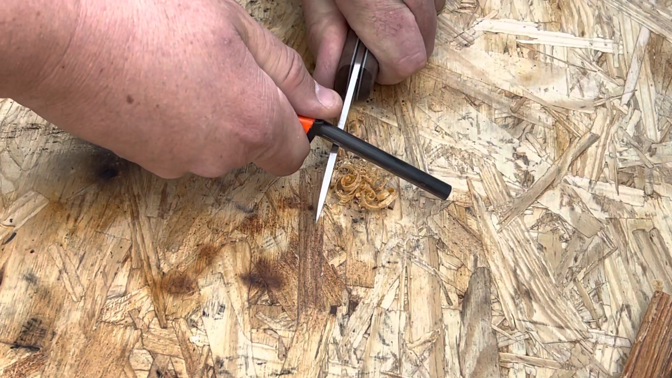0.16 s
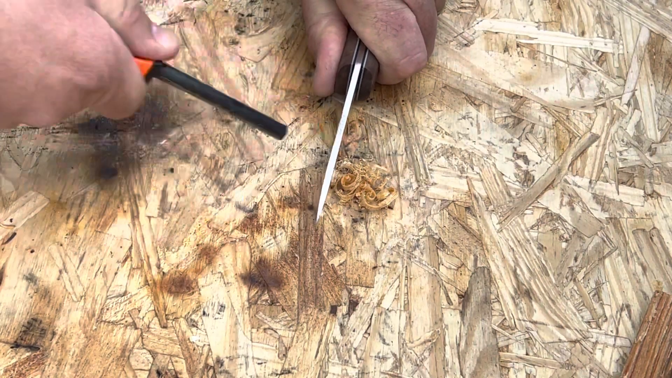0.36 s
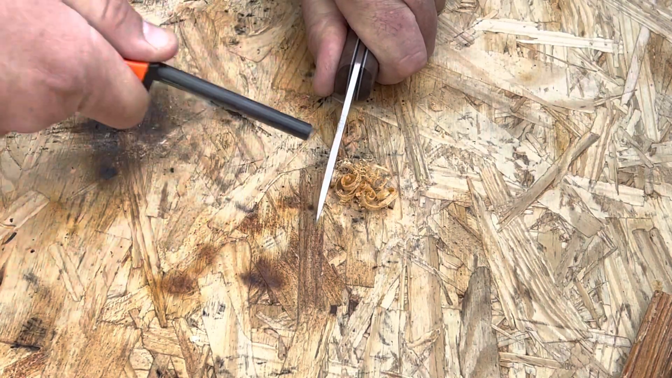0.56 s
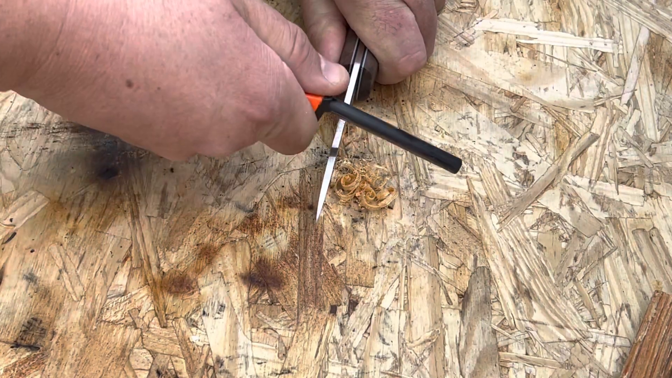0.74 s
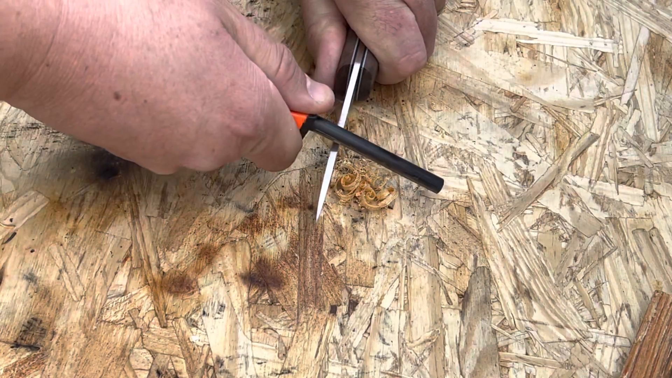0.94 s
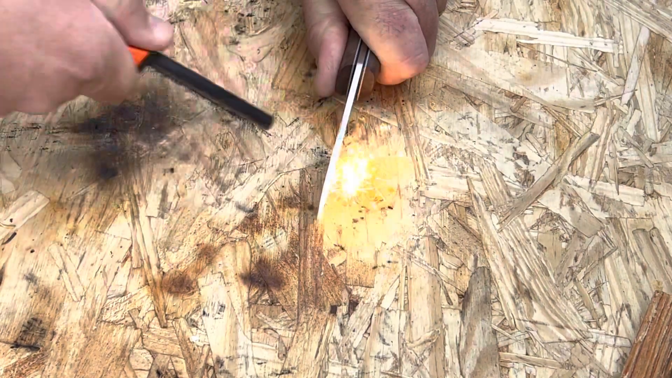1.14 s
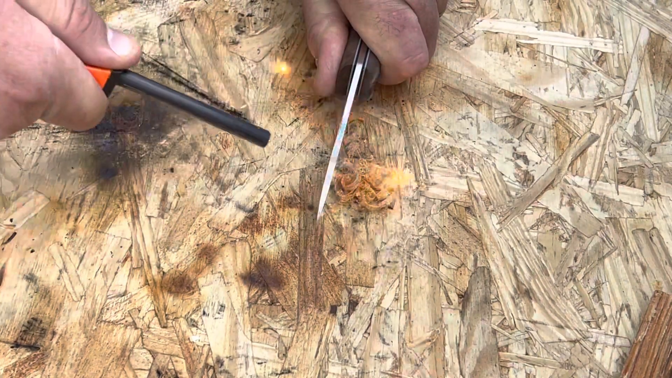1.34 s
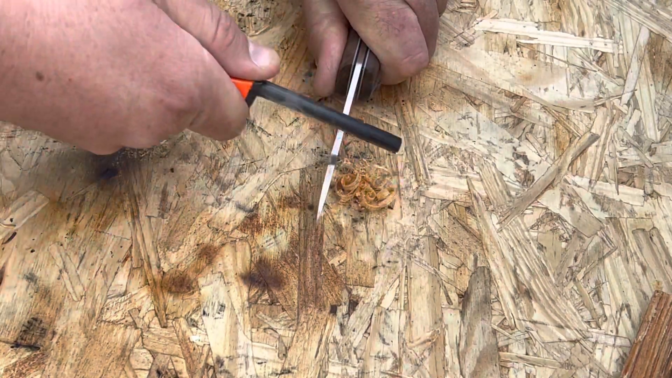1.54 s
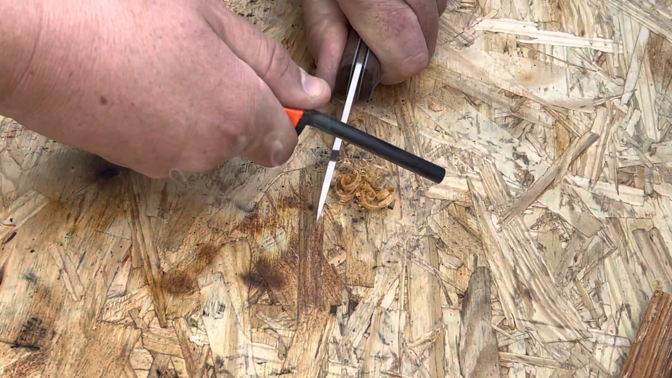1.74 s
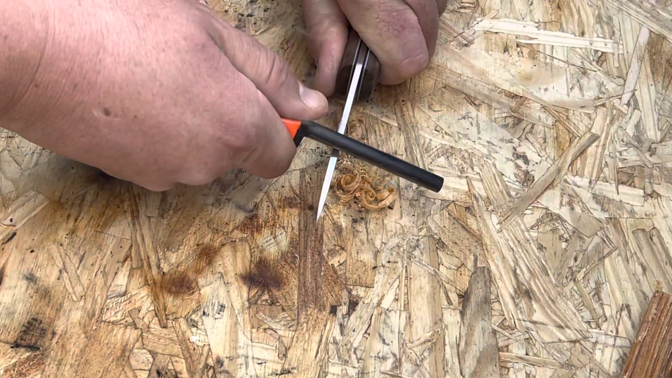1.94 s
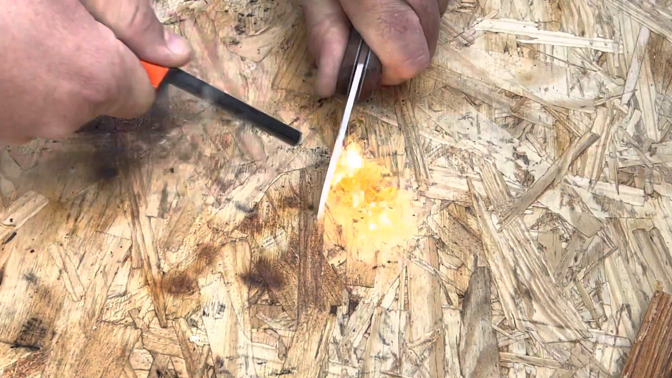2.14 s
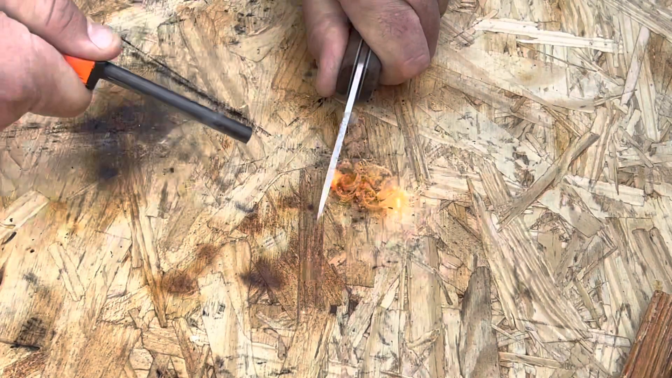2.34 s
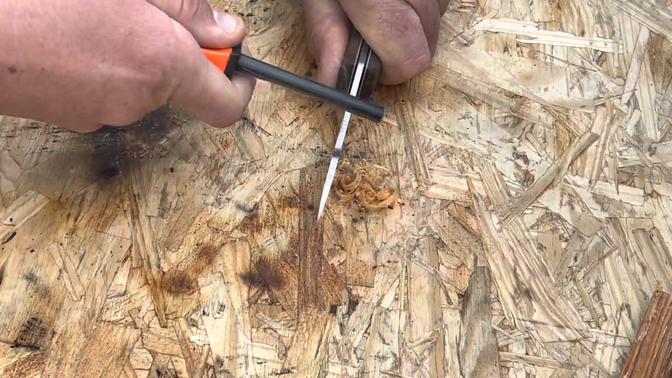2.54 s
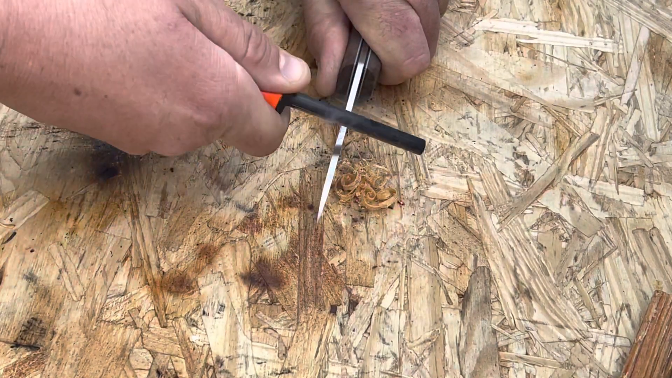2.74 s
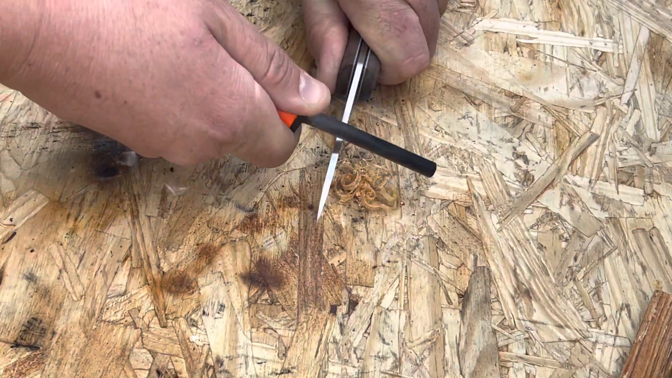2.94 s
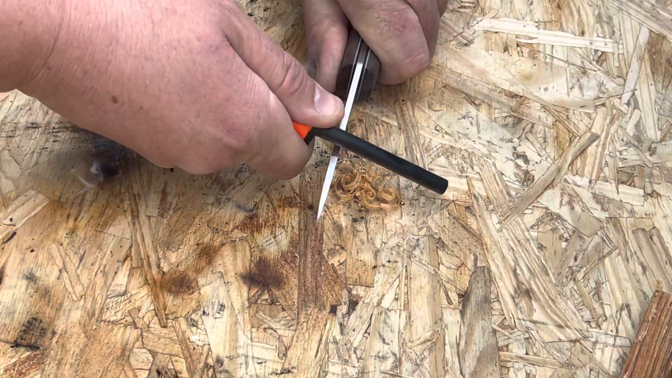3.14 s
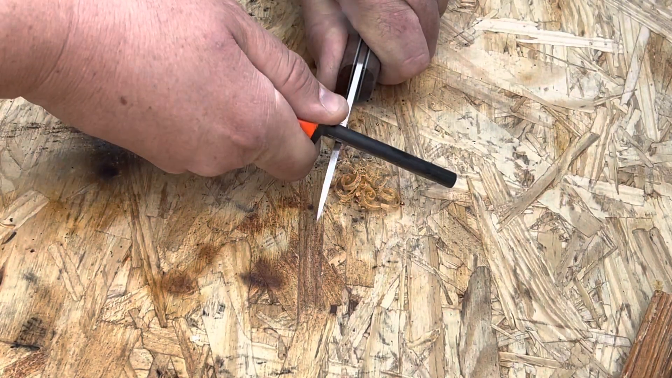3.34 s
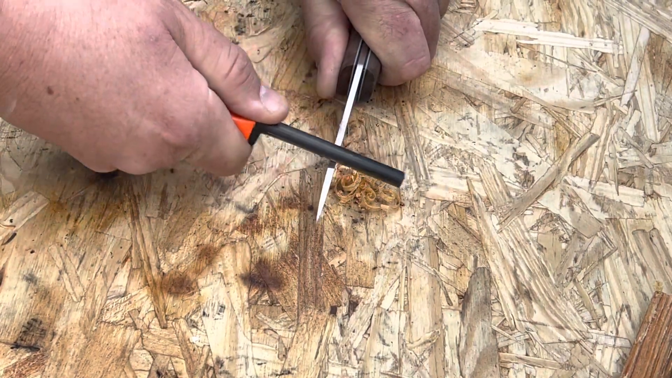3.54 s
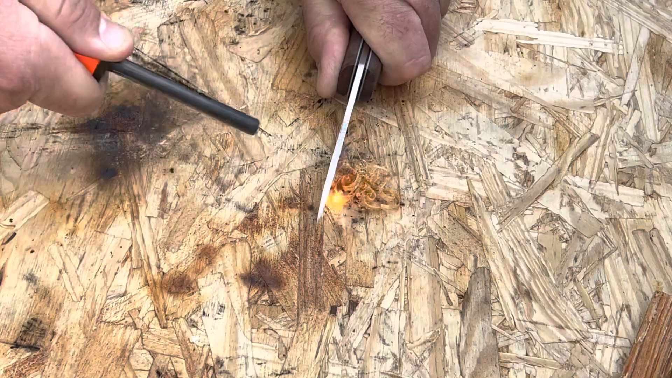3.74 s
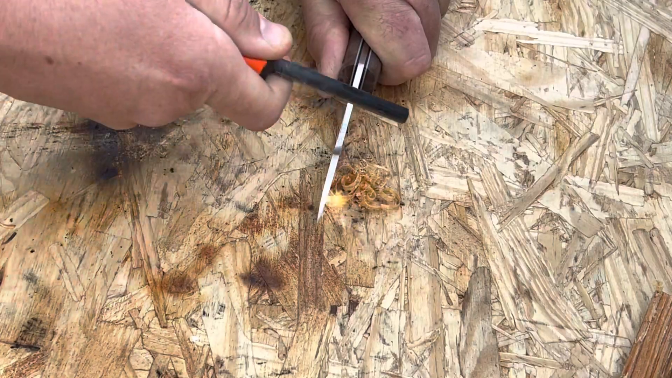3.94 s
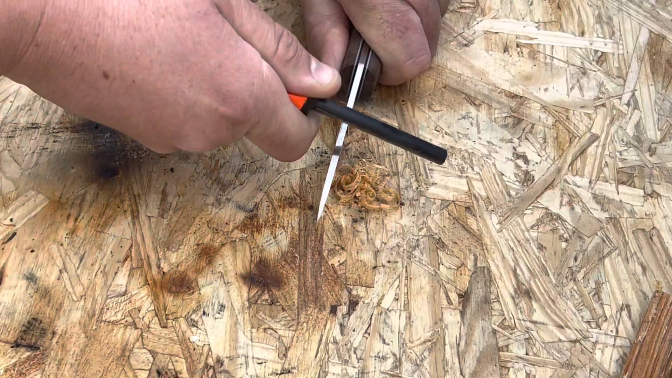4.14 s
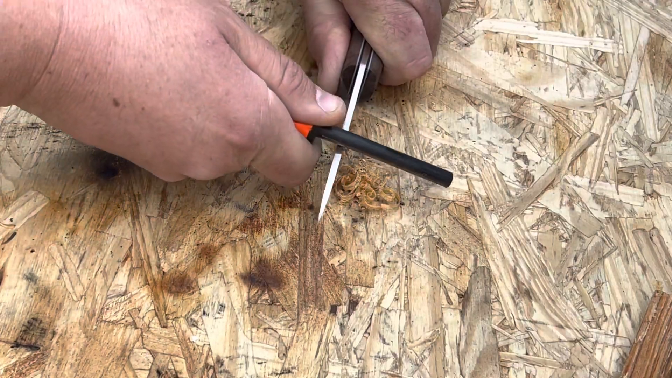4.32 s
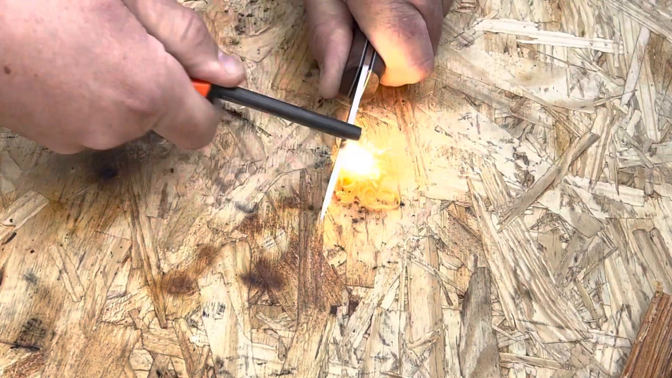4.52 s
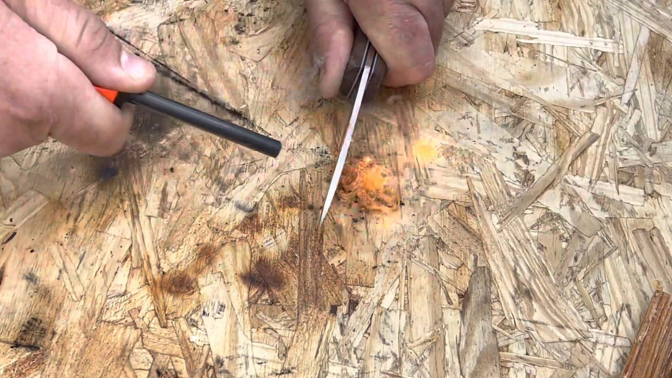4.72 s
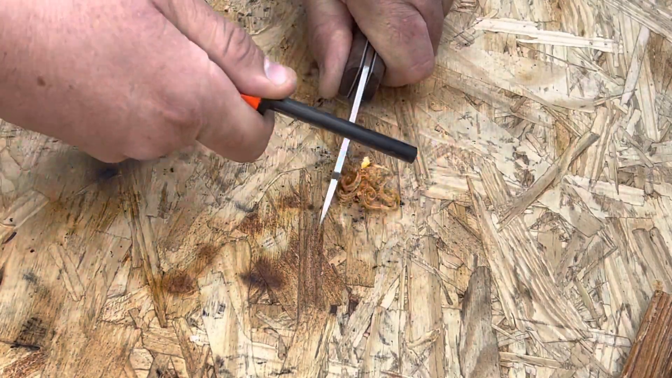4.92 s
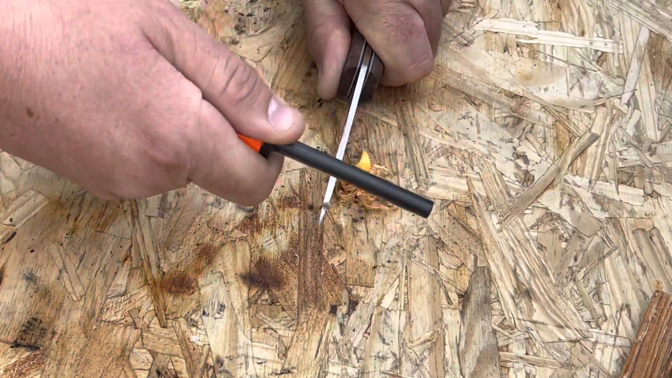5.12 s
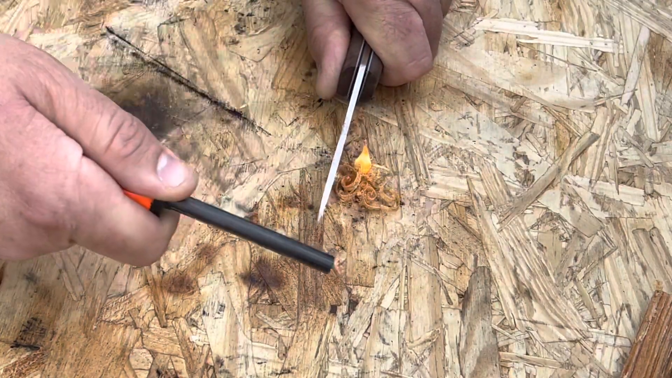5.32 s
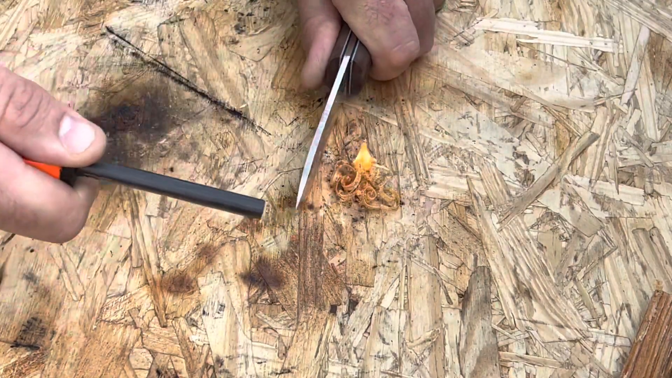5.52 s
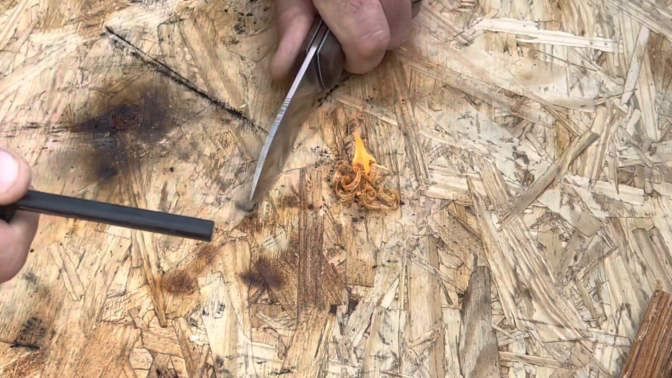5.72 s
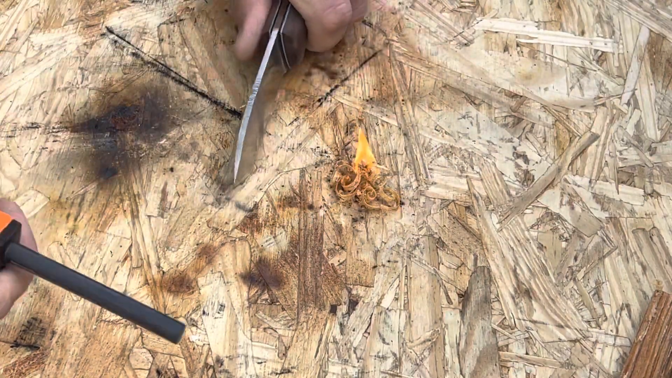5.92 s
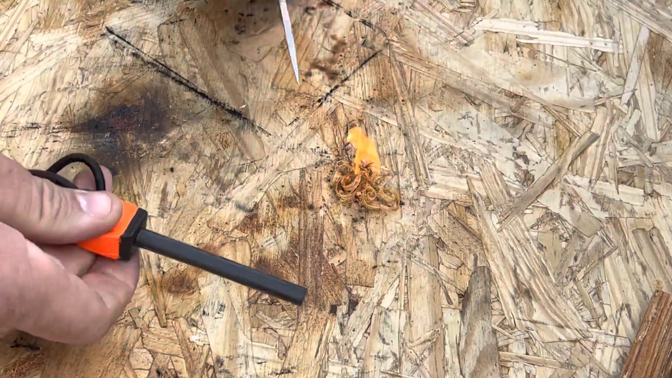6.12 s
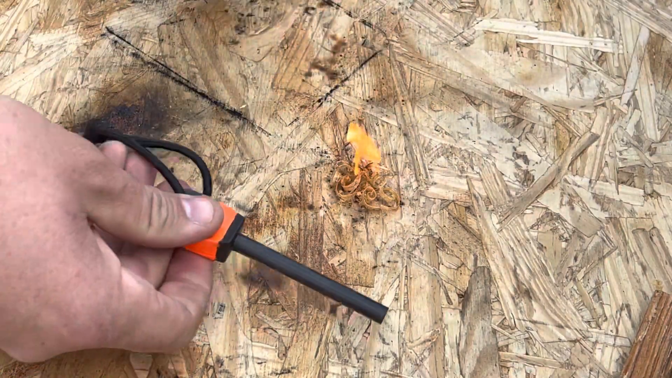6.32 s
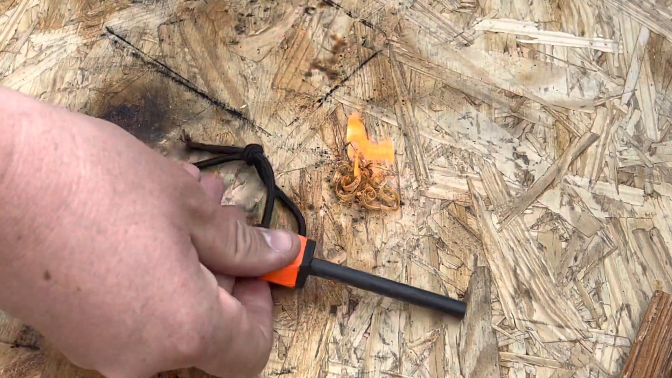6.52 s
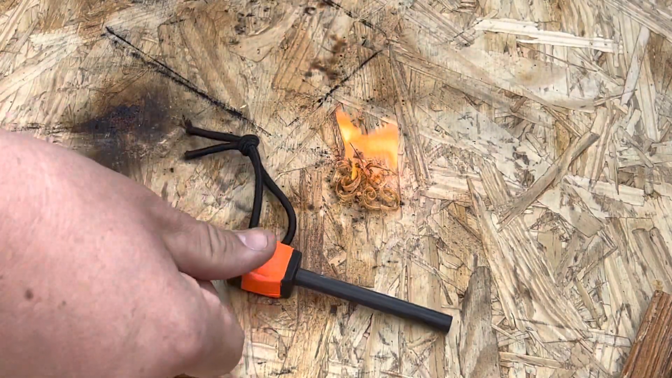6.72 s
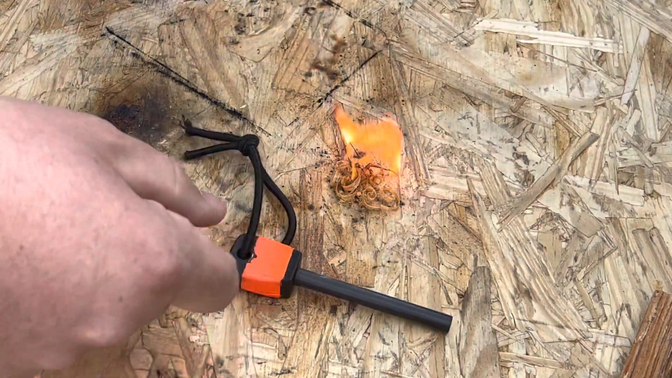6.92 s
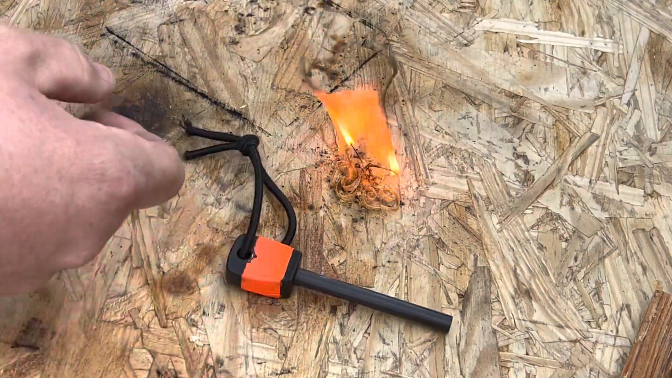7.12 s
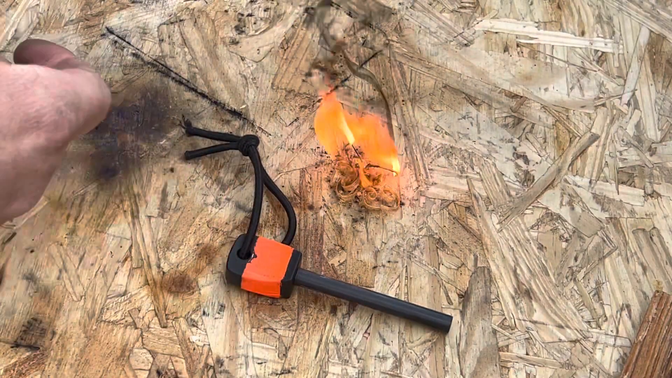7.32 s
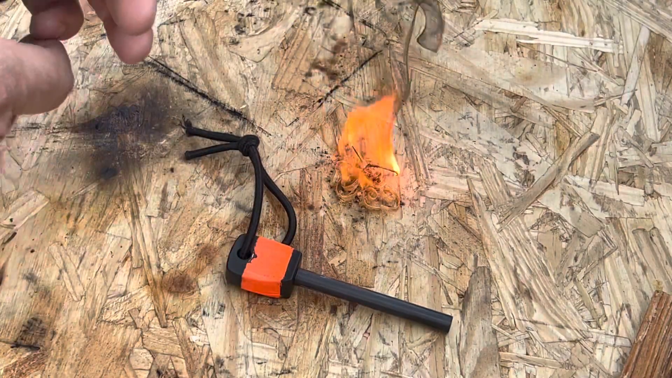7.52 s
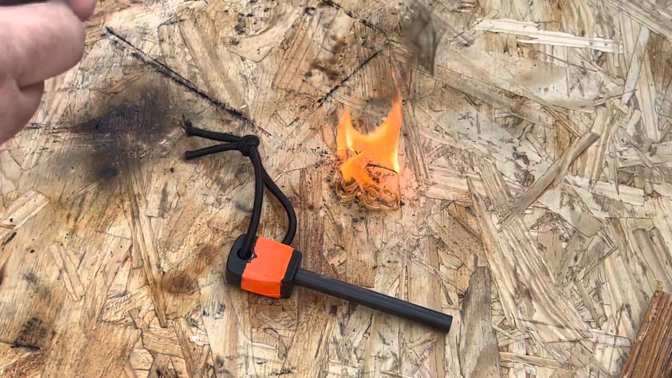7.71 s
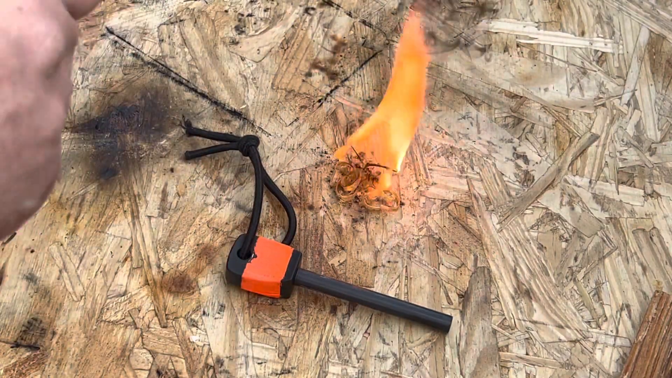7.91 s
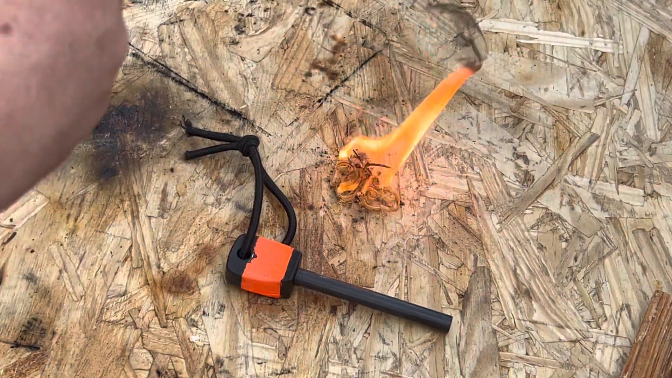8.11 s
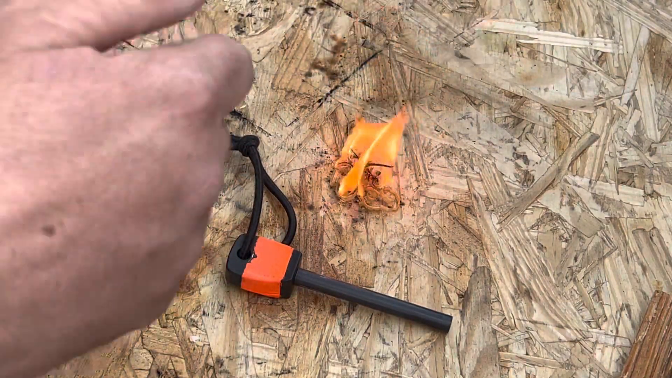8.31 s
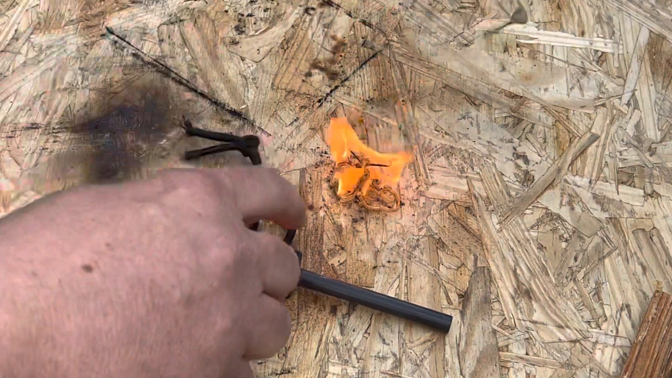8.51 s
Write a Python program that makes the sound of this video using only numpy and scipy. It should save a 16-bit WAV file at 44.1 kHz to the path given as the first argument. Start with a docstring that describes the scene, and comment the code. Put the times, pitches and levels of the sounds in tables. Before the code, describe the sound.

Outdoors, close stereo pickup over a chipboard bench, with faint low traffic rumble and hum throughout. After tiny taps at 0.1 s, a duller rasp of steel on rod grinds from 0.2 to 0.36 s, followed by a hand shuffle and rub near 0.55 s and a tap at 0.87. A hard, bright scrape bites at 1.03-1.13 s, sparks spitting until 1.3. A firm knock lands at 1.82, then another harsh scrape at 2.03-2.16 with fizz trailing to 2.5. A tap at 3.2 precedes a longer building rasp at 3.4-3.6; a lighter tap at 4.27 leads to the last sharp scrape at 4.44-4.55, sparks crackling after. From 5 s a small flame ticks and hisses very faintly, with spits near 5.48. Hands shuffle around 6 s; the rod is set down with woody clacks at 6.44, 6.62 and 6.7. Soft rustling, weak spits and barely audible low tones near 7.3-7.8 and 8.4 finish quietly.

```python
"""A fire rod is dragged five times across a knife spine above a chipboard bench outdoors.
The edge catches and slips on the rod: random grains and jolts ring the modes of board and steel, sparks hiss
and spit as coloured noise. Between strokes the rod is tapped onto the spine, at the end laid on the board.
Sleeves rustle, a small flame ticks, faint low tones come and go, far traffic rumbles in shaped stereo noise.
Two microphone ports hear the bench with a phase and level difference that depends on frequency."""
import sys
import numpy as np
from scipy import signal
from scipy.fft import rfft, irfft, next_fast_len
from scipy.io import wavfile

SR = 44100
rng = np.random.default_rng(int(sys.argv[2]) if len(sys.argv) > 2 else 0)


def transcribe(u):
    """Save the signal u as a 16-bit wav file named by the first command-line argument.

    u: samples, shape (n,) or (channels, n), limited to [-1, 1]; the rate is SR.
    q: integer samples, one column per channel.
    """
    v = np.clip(np.atleast_2d(u).T, -1, 1)
    q = np.round(v * 32767).astype(np.int16)
    wavfile.write(sys.argv[1], SR, q)


def how_loud(loudness_db):
    """Turn decibels into a plain amplitude multiplier (0 dB gives 1, 20 dB gives 10)."""
    steps = np.asarray(loudness_db, float) / 20
    return 10 ** steps


N = 377496   # samples


def at_hz(points, hz):
    """Reads a table on a log-frequency axis."""
    points = np.array(points)
    return np.interp(np.log(hz + 1), np.log(points[:, 0]), points[:, 1])


def in_time(rows, outside=None):
    """Columns of a curve, sample by sample."""
    s, *columns = np.transpose(rows)
    return np.array([np.interp(np.arange(N) / SR, s, c, outside, outside) for c in columns])


def band(x, low_hz, high_hz):
    """Band-pass."""
    return signal.sosfilt(signal.butter(2, [low_hz, high_hz], "band", fs=SR, output="sos"), x)


def band_one(x, low_hz, high_hz):
    """Scales so that one band has rms 1."""
    return x / np.std(band(x, low_hz, high_hz))


def drift(rate):
    """Slow chance: random knots of spread 1, rate of them a second, joined by lines."""
    knots = rng.standard_normal(4000)
    return np.interp(np.arange(N) * rate / SR, np.arange(len(knots)), knots)


def coloured(spectrum, x):
    """Gives noise a spectrum."""
    size = next_fast_len(N)
    gain = how_loud(at_hz(spectrum, np.fft.rfftfreq(size, 1 / SR)))
    return irfft(rfft(x, size) * gain, size)[..., :N]


def ring(x, modes, wander_db=0):
    """Parallel decaying sines of alternating sign, driven by one force or by one for each mode.
    A moving contact makes each mode's share wander."""
    out = np.zeros(N)
    for k, (hz, level_db, t60) in enumerate(modes):
        radius = how_loud(-60 / (t60 * SR))
        w = 2 * np.pi * hz / SR
        force = (x if x.ndim == 1 else x[k]) * how_loud(wander_db * drift(30))
        gain = how_loud(level_db) * np.sin(w) * (-1) ** k
        out += signal.lfilter([0, gain], [1, -2 * radius * np.cos(w), radius ** 2], force + 1e-18)
    return out


def grains(per_s, spread_db):
    """Random clicks of uneven size and either sign."""
    sizes = how_loud(spread_db * np.minimum(rng.exponential(1, N), 4)) * rng.choice([-1, 1], N)
    return sizes * (rng.random(N) < per_s / SR)


def bursts(rows):
    """Noise puffs (start s, level dB, decay s): quick rise, exponential fall."""
    shape = np.zeros(N)
    for s, level_db, decay in rows:
        start = round(s * SR)
        t = np.arange(N - start)[:SR // 4] / SR
        shape[start:start + len(t)] += how_loud(level_db) * (1 - np.exp(-t / 0.00044)) * np.exp(-t / decay)
    return shape * rng.standard_normal(N)


def swell(s, length):
    """Half a sine from 0 to 1 and back."""
    t = np.arange(N) / SR
    return np.sin(np.pi * np.clip((t - s) / length, 0, 1))


# Spectrum of the far traffic. Each row: frequency in Hz, level in dB.
TRAFFIC_SPECTRUM = [(24, -33.5), (40, 1.5), (97, -2.5), (124, -0.5), (209, -6.5), (304, -10), (498, -18),
                    (2000, -29.5), (2600, -53), (4400, -120)]
# How alike the traffic is at left and right. Each row: frequency in Hz, likeness from 0 to 1.
TRAFFIC_LIKENESS = [(100, 1), (350, 0.7), (700, 0.46), (1050, 0.11), (1400, .75), (1700, 1)]


def outdoors():
    """Far traffic, lumpy and partly unlike in the two channels, and a low hum: noise through one resonance."""
    size = next_fast_len(N)
    alike = np.clip(at_hz(TRAFFIC_LIKENESS, np.fft.rfftfreq(size, 1 / SR)), 0, 1)
    mid, side = rfft(rng.standard_normal((2, size)))
    pair = np.sqrt(1 + alike) * mid + np.sqrt(1 - alike) * side * [[1], [-1]]
    pair = irfft(pair, size)[:, :N]
    lumps_db = 2.5 * drift(2) + 1.5 * drift(12)
    rumble = band_one(coloured(TRAFFIC_SPECTRUM, pair), 25, 2000) * how_loud(-54 + lumps_db)
    hum_hz, hum_db = 118.06, -62.5
    hum = ring(rng.standard_normal(N), [(hum_hz, 0, .6)])
    return rumble + how_loud(hum_db) * hum / np.std(hum)


# Faint low tones that come and go. Each row: start in seconds, length in seconds, pitch in Hz before the
# waver, level in dB.
FAINT_TONES = [(7.269, .2, 314, -55), (7.49, 0.082, 308, -60.5), (7.69, 0.14, 342.5, -57),
               (8.39, .12, 294, -58)]


def low_tones():
    """Slightly wavering sines that swell and fade."""
    wavering_s = np.cumsum(1 + 0.011 * drift(25)) / SR
    out = np.zeros(N)
    for s, length, hz, level_db in FAINT_TONES:
        out += how_loud(level_db) * swell(s, length) ** 0.47 * np.sin(2 * np.pi * hz * wavering_s)
    return out


LIT_S = 5.0   # the shavings catch fire

# Arm and hand moves at the bench. Each row: start in seconds, length in seconds, relative level of the dull
# shuffle in dB, relative level of the bright rustle in dB.
ARM_MOVES = [(0.467, .34, -57, -57), (1.352, .42, -66, -68.5), (1.902, 0.15, -63.5, -68.5),
             (2.42, .52, -68.5, -73), (3.1, 0.31, -67, -83), (3.769, 0.35, -69, -66),
             (4.133, 0.33, -64.5, -80), (4.68, 0.41, -69.5, -66), (5.369, 0.29, -65.5, -71.5),
             (5.961, .34, -52.5, -69.5), (6.466, 0.75, -62.5, -81.5), (7.186, 0.38, -60.5, -80),
             (7.74, .26, -67.5, -70), (8.157, .5, -68, -75.5)]
# Short rubs of hand, cord and rod on the wood. Each row: start in seconds, length in seconds,
# level in dB, centre in Hz.
WOOD_RUBS = [(0.544, 0.063, -46.5, 480), (0.605, 0.091, -47, 228), (3.938, 0.14, -62.5, 1450),
             (4.913, 0.11, -60, 2070), (5.767, 0.11, -57.5, 632), (6.005, 0.16, -55.5, 946),
             (6.025, 0.35, -68.5, 2050), (6.298, 0.073, -58, 610), (6.454, 0.12, -42, 393),
             (6.93, 0.1, -55.5, 2234)]
# Spectrum of skin on wood. Each row: frequency in Hz, level in dB.
SKIN_SPECTRUM = [(150, -0.5), (300, 3.5), (700, -8.5), (1400, -11.5), (2500, -9), (4000, -27)]
# Spectrum of the sleeves. Each row: frequency in Hz, level in dB.
CLOTH_SPECTRUM = [(1500, -20.5), (3000, -2), (7000, -1), (10000, -1), (15500, -15.5)]


def rustle():
    """Skin on wood is dull, cloth bright and grainy; both swell with each move; single rubs are band noise.
    The flame's faint hiss joins the bright layer."""
    rest_dull_db, rest_bright_db, flame_db = -70.5, -78, -78.5   # hands at rest; relative levels
    dull = np.full(N, how_loud(rest_dull_db))
    bright = how_loud(rest_bright_db) + how_loud(flame_db) * (np.arange(N) / SR > LIT_S)
    for s, length, dull_db, bright_db in ARM_MOVES:
        move = swell(s, length) ** 2.0
        dull = dull + how_loud(dull_db) * move
        bright = bright + how_loud(bright_db) * move
    skin = rng.standard_normal(N) * how_loud(3.8 * drift(40))
    skin = band_one(coloured(SKIN_SPECTRUM, skin), 590, 2500)
    cloth = rng.standard_normal(N) * how_loud(1.1 * drift(67)) + grains(150, spread_db=7.5)
    cloth = band_one(coloured(CLOTH_SPECTRUM, cloth), 2800, 8200)
    out = how_loud(-6.0) * dull * skin + bright * cloth * how_loud(3.2 * drift(13))
    grit = rng.standard_normal(N) * how_loud(2.3 * drift(120))
    for s, length, level_db, hz in WOOD_RUBS:
        span = slice(round(s * SR), round((s + length) * SR))
        rub = band(grit[span], hz / 1.7, hz * 1.7)
        out[span] += how_loud(level_db) * rub / np.std(rub) * np.hanning(len(rub)) ** .5
    return out


# Single spits of sparks, shavings and flame. Each row: start in seconds, relative level in dB.
SINGLE_SPITS = [(0.1285, -47.5), (1.2049, -23.5), (1.2511, -22.5), (1.3244, -46), (1.479, -41.5),
                (2.2674, -29), (2.3474, -28), (2.4178, -34.5), (2.5396, -44.5), (3.8364, -36.5),
                (3.9513, -38), (4.7474, -30), (4.7614, -32), (5.4566, -39), (5.4824, -25.5),
                (5.4948, -28.5), (7.0618, -51), (7.2878, -50), (7.6091, -46), (7.7657, -45.5)]
# Spectrum of burning sparks. Each row: frequency in Hz, level in dB.
SPARK_SPECTRUM = [(300, -3), (1000, -1.5), (2500, -3), (4000, -1.5), (6000, -4.5), (8000, -0.5),
                  (10000, -0.5), (12000, -6), (15500, -11)]


def spits():
    """Single spits as short noise puffs, and faint random ticks of the burning shavings."""
    lit = np.arange(N) / SR > LIT_S
    ticks = how_loud(-52) * lit * grains(28, spread_db=6.0)
    puffs = bursts([(s, level_db - 3, .009) for s, level_db in SINGLE_SPITS])
    return coloured(SPARK_SPECTRUM, puffs + ticks)


# Knocks of rod and handle on spine and board. Each row: start in seconds, relative crack level in dB, push
# in dB, contact cut-off in Hz, relative clack level in dB.
ROD_KNOCKS = [(0.12, -47, -42.5, 1500, -58), (0.136, -56, -38, 1200, -58), (0.561, -55, -41.5, 700, -59),
              (0.5763, -56, -34, 700, -80), (0.8692, -23.5, -26.5, 1500, -55.5),
              (1.8228, -14, -19, 1500, -49.5), (2.539, -58, -49.5, 1500, -67),
              (2.765, -66, -53.5, 905, -79), (3.206, -28, -21.5, 1300, -49.5),
              (3.309, -51, -43.5, 1300, -68), (4.141, -54, -46.5, 1200, -73),
              (4.231, -62, -40.5, 1000, -78), (4.2664, -28.5, -24, 1400, -69),
              (4.361, -57, -40.5, 990, -68), (5.12, -69, -59.5, 1400, -63), (6.19, -70, -52, 1500, -54.5),
              (6.4428, -26.5, -25.5, 1800, -30), (6.6205, -24, -23.5, 2200, -18.5),
              (6.7027, -15, -22, 1800, -24.5), (6.728, -52, -28.5, 1000, -61), (6.745, -59, -29, 900, -73)]
# Modes of the chipboard. Each row: frequency in Hz, relative level in dB, decay by 60 dB in seconds.
BOARD_MODES = [(206, -5.5, 0.15), (340.7, -2.5, 0.081), (407.8, -5, 0.047), (553.6, -1, 0.12),
               (571, 0.5, 0.079), (662.6, -13.5, 0.075), (746, -14.5, 0.12), (867.8, 16.5, 0.0056),
               (878, -9, 0.09), (957, -10, 0.032), (1096, -14.5, 0.078), (1196.6, -7.5, 0.013),
               (1200, 0.5, 0.043), (1948, -10, 0.0042)]


def knocks():
    """A smooth push, shorter for harder contact, strikes each board mode with its own strength.
    Clack, crack and snap are noise puffs on top."""
    push = np.zeros((len(BOARD_MODES), N))
    luck = how_loud(2 * rng.standard_normal((len(ROD_KNOCKS), len(BOARD_MODES), 1)))
    for (s, crack_db, push_db, cut_hz, clack_db), share in zip(ROD_KNOCKS, luck):
        pulse = np.hanning(int(SR / cut_hz) + 3)
        start = round(s * SR)
        push[:, start:start + len(pulse)] += how_loud(push_db) * share * pulse / pulse.sum()
    # the hand's weight follows as a second push into the low modes
    settle_s, settle_db, settle_below_hz = .03, -4, 450
    low, lag = np.array(BOARD_MODES)[:, 0] < settle_below_hz, round(settle_s * SR)
    push[low, lag:] += how_loud(settle_db) * push[low, :-lag] * luck[0, low]

    def puffs(column, offset_db, decay):
        return bursts([(row[0], row[column] + offset_db, decay) for row in ROD_KNOCKS])

    clack = puffs(4, 16, .005) + puffs(4, 3, .022)
    crack = puffs(1, 4, .003) + puffs(1, -11, .022)
    snap = puffs(1, -12, .002)
    thud = band(ring(push, BOARD_MODES), 125, 6000)
    crack = band(band(crack, 2300, 3600), 2000, 5500)
    return thud + band(clack, 820, 2500) + crack + band(snap, 5500, 9000)


# Hard catches of the edge within the strokes. Each row: start in seconds, relative level in dB.
EDGE_CATCHES = [(0.284, -20), (0.336, -5.5), (0.358, -8.5), (1.088, -3.5), (1.108, 0.5), (1.133, -4),
                (2.093, -1.5), (2.124, 2), (2.155, -8.5), (3.534, -3), (3.558, -4), (3.618, -10.5),
                (4.508, 0), (4.53, 1.5), (4.548, -6.5)]
# Modes of the steel. Each row: frequency in Hz, relative level in dB, decay by 60 dB in seconds.
STEEL_MODES = [(2620, -4, 0.015), (3090, 0.5, 0.028), (3510, 2.5, 0.016), (3723, -3, 0.017),
               (4260, -8, .01), (5200, -14, 0.01), (8260, -14, 0.06), (12850, -19, .03)]


def catches():
    """A short jolt of a few ms into board and steel."""
    jolt = band(bursts([(s, level_db, .003) for s, level_db in EDGE_CATCHES]), 450, 3500)
    board = how_loud(-32.5) * ring(jolt, BOARD_MODES, wander_db=5.5)
    return board + how_loud(-38.5) * ring(jolt, STEEL_MODES, wander_db=1.5)


# The five drags of the rod. Each row: edge touches at in seconds, pressure builds for in seconds, full bite
# lasts in seconds, then relative levels: bite in dB, pressure change meanwhile in dB, thrust into the board
# in dB, ringing of the steel in dB, spark hiss in dB; sparks burn on for in seconds, fading by in dB.
ROD_STROKES = [(0.189, 0.093, 0.078, -22, 3.5, -15, -41, -46.5, 0.045, 11),
               (1.034, 0.059, 0.036, -9, -2, -23, -39, -41, 0.1, 3),
               (2.033, 0.049, 0.074, -16.5, -1.5, -20, -36, -40.5, 0.31, 24.5),
               (3.408, 0.13, .085, -16.5, -8.5, -19, -39, -39.5, 0.046, 5.5),
               (4.443, 0.068, 0.042, -11.5, 3, -17.5, -36.5, -40, .1, 8.5)]


def stroke_curve(layer, levels_db, follows=0, linger_s=np.zeros(len(ROD_STROKES)),
                 fade_db=np.zeros(len(ROD_STROKES))):
    """Gain of one layer through all strokes: touch, build, full bite, linger, drop, fall."""
    late_s, touch_db, halfway, change_db, drop_db, drop_s, fall = layer
    touch_s = .008   # rise at first touch
    out = np.zeros(N)
    for row, db, linger, fade in zip(ROD_STROKES, levels_db, linger_s, fade_db):
        s, build, hold, bite_db, pressure_db, *_ = row
        to_half = max(build / 2 - touch_s - late_s, 0)
        times = s + np.cumsum([late_s, touch_s, to_half, build / 2, hold, linger, drop_s, 1])
        half_db = touch_db + halfway * (db - touch_db)
        full_db = db + change_db + follows * pressure_db
        left_db = full_db - fade
        dropped_db = left_db + drop_db
        levels = [touch_db - 29.5, touch_db, half_db, db, full_db, left_db, dropped_db, dropped_db - fall]
        out += how_loud(in_time(np.transpose([times, levels]), -200)[0])
    return out


# How four layers follow a stroke: the edge's bite, thrust into the board, ringing steel, spark hiss.
# Each row: starts after the touch by in seconds, first level in relative dB, share of the climb made halfway
# through the build from 0 to 1, change over the full bite in dB, first drop in dB, reached this many seconds
# later (negative: the point is set back before the release), then fall in dB per second.
BITE_COURSE = (0, -31, .25, 0, -36, .03, 150)
THRUST_COURSE = (0.04, -46.5, 0.61, -6.5, -12, -0.1137, 130)
STEEL_COURSE = (.008, -47, .45, 10, -26, .03, 300)
HISS_COURSE = (.008, -56, .7, 3, -8, .04, 220)


def strokes():
    """Stick-slip of edge on rod: coarse slips shake blade and board, fine ones the steel.
    Burning flakes hiss; the bench heaves."""
    bite_db, pressure_db, thrust_db, steel_db, hiss_db, burn_s, fade_db = np.transpose(ROD_STROKES)[3:]
    bite = stroke_curve(BITE_COURSE, bite_db, 1)
    thrust = stroke_curve(THRUST_COURSE, thrust_db)
    steel = stroke_curve(STEEL_COURSE, steel_db, .6)
    hiss = stroke_curve(HISS_COURSE, hiss_db, .3, burn_s, fade_db)

    slips = band(grains(1100 * how_loud(2.7 * drift(80)), spread_db=3.0), 340, 6600)
    # bite drives the modes above 750 Hz, thrust the lower ones
    force = np.array([slips * (bite if hz > 750 else thrust) for hz, level_db, t60 in BOARD_MODES])
    board = how_loud(-21.5) * ring(force, BOARD_MODES, wander_db=4.0)
    fine = grains(3000, spread_db=7.0) + 0.22 * slips
    blade = ring(fine * steel * how_loud(-22.5), STEEL_MODES, wander_db=2.0)

    fizz = rng.standard_normal(N) * how_loud(2.8 * drift(90)) + 1.9 * grains(600, spread_db=5.5)
    sparks = hiss * band_one(coloured(SPARK_SPECTRUM, fizz), 3200, 7500)

    smooth_thrust = signal.lfilter([1 / (0.041 * SR)], [1, 1 / (0.03 * SR) - 1], thrust)
    heave = band_one(band(rng.standard_normal(N), 33, 280), 68, 120)
    heave = heave * how_loud(-28.5) * np.sqrt(smooth_thrust)
    return board + blade + heave + sparks


def bench_scatter(x):
    """Dull scattered returns from bench and surroundings: decaying noise, different for each side."""
    t = np.arange(SR // 4) / SR
    decay = how_loud(-60 * t / 0.17) * (t > .002)   # 60 dB in 0.17 s
    tail = band(rng.standard_normal((2, len(t))) * decay, 640, 2100)
    tail = tail / np.sqrt(np.sum(tail ** 2, axis=1, keepdims=True))
    return signal.fftconvolve(x[None], tail, axes=1)[:, :N]


def scene():
    """Everything on the bench, its scatter and the open air."""
    struck = strokes() + catches() + knocks()
    scatter = how_loud(-21) * bench_scatter(struck)
    return struck + scatter + spits() + rustle() + low_tones() + outdoors()


def low_pass(x):
    """Removes everything above the highest recorded frequency."""
    return signal.sosfilt(signal.butter(12, 16390, fs=SR, output="sos"), x)


# Phase between the two microphone ports. Each row: frequency in Hz, lead of the right in radians.
PORT_PHASE = [(800, -.1), (1250, .3), (2000, 0), (2600, -.1), (3100, -.55), (3700, -.5), (5000, 0),
              (7400, 0), (8250, .92), (8800, 1.6), (9300, 2.85), (10000, 3.14), (10850, 3.45), (11900, 5.0),
              (13200, 6.28), (14100, 6.3), (15500, 8.4)]
# Level between the two ports. Each row: frequency in Hz, left over right in dB.
PORT_LEVEL = [(100, 0.75), (500, 2.5), (1100, 2.5), (1700, -1.4), (3000, 0.5)]


def record(dry):
    """The microphone: bass cut, two ports that differ in phase and level by frequency, rounded peaks."""
    dry = signal.sosfilt(signal.butter(4, 42, "high", fs=SR, output="sos"), dry)
    size = next_fast_len(N)
    hz = np.fft.rfftfreq(size, 1 / SR)
    # each port takes half of the difference
    half = how_loud(at_hz(PORT_LEVEL, hz) / 2) * np.exp(-.5j * at_hz(PORT_PHASE, hz))
    ports = irfft(rfft(dry, size) * np.array([half, 1 / half]), size)[:, :N]
    mix = np.tanh(ports)   # peaks stay below 1
    return low_pass(mix)


dry = scene()
out = record(dry)
transcribe(out)
```